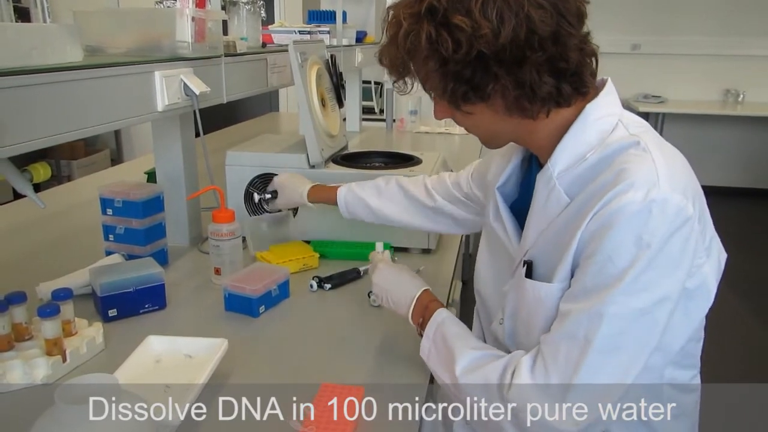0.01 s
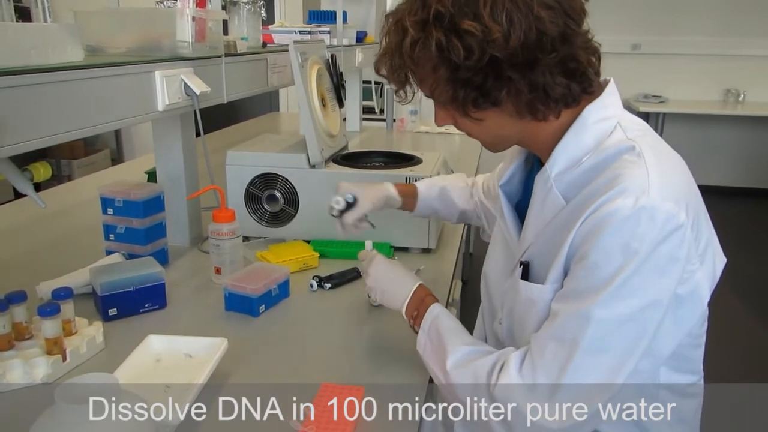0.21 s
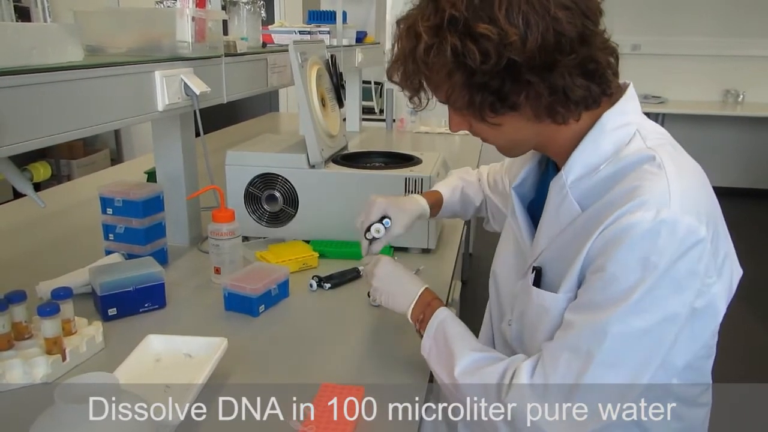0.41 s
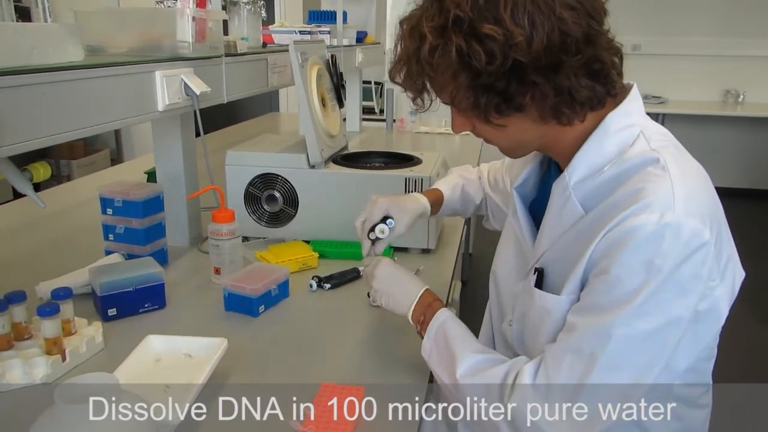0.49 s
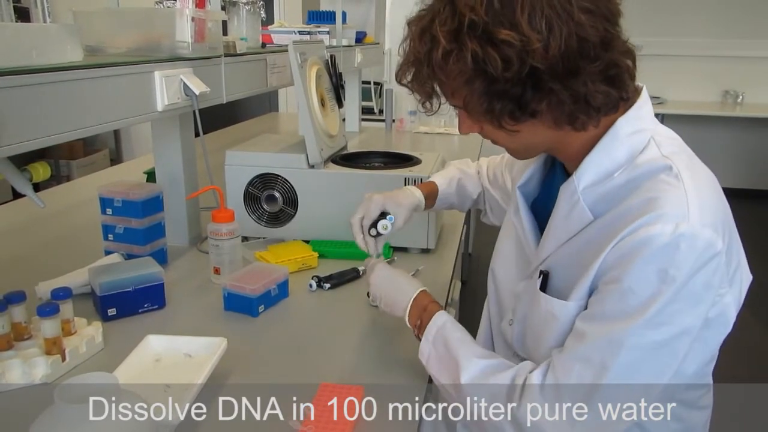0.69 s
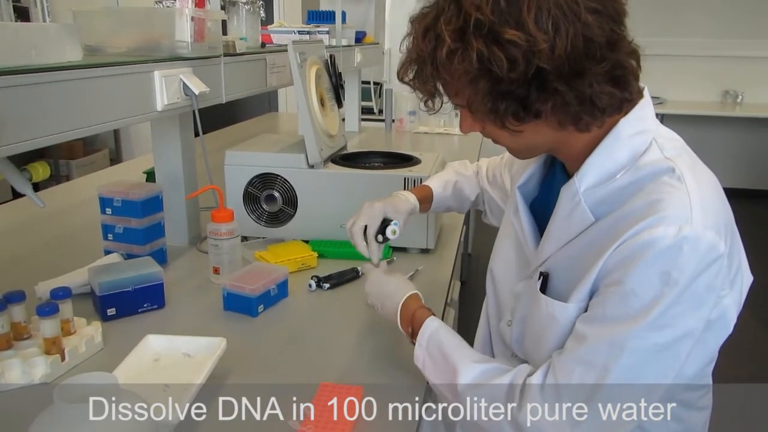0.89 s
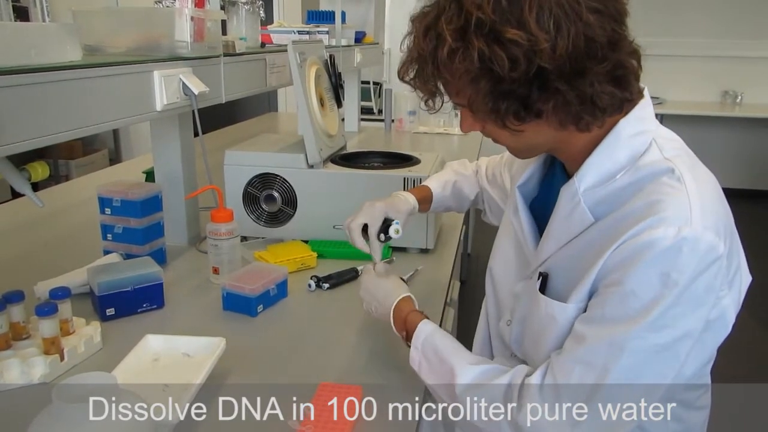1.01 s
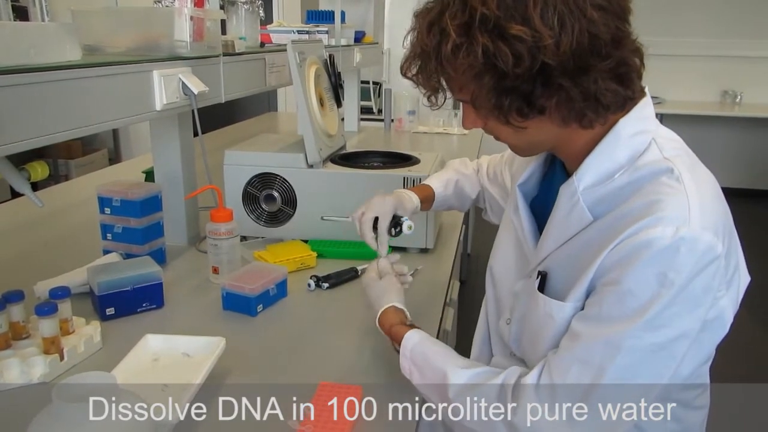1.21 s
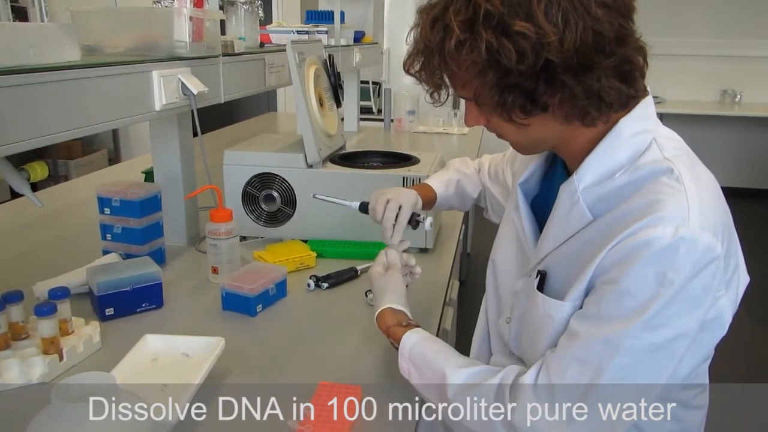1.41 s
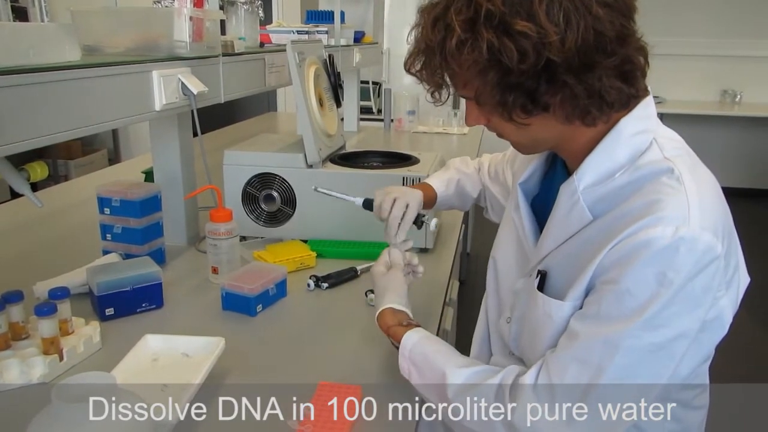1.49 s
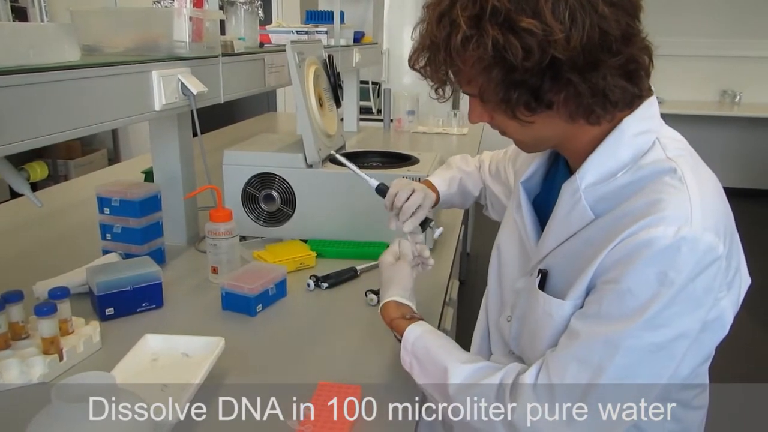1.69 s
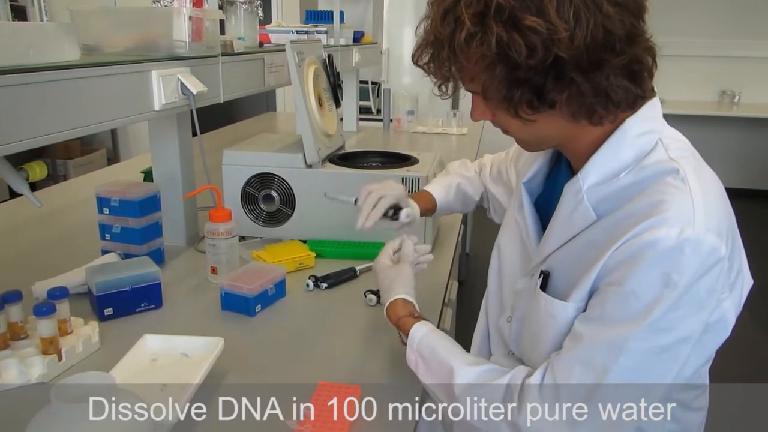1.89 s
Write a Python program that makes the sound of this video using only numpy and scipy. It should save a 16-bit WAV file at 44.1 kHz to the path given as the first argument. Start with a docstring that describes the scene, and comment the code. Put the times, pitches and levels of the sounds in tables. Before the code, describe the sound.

Two crisp plastic clicks from a lab pipette echo briefly, followed by very light handling ticks

```python
"""Quiet laboratory bench: a plastic pipette and a sample tube are handled.
Hard plastic snaps twice, as cracks and damped modes; the room echoes and bench items ring faintly.
Then light ticks (band-limited bursts) and small clinks of the plunger spring (rattle plus modes).
Ventilation hums low as shaped noise; the recorder's gain control ducks everything after the loud snap."""
import sys
import numpy as np
from scipy import signal
from scipy.fft import rfft, irfft
from scipy.io import wavfile
from scipy.ndimage import minimum_filter1d

SR = 44100
rng = np.random.default_rng(int(sys.argv[2]) if len(sys.argv) > 2 else 0)


def put_to_file(sound):
    """Save the sound as 16-bit audio at rate SR, in the file named by the first command-line argument."""
    columns = np.atleast_2d(sound).T  # one column per channel
    safe = np.clip(columns, -1, 1)
    whole_steps = np.round(safe * 32767)
    wavfile.write(sys.argv[1], SR, whole_steps.astype(np.int16))


N = 88200  # samples, 2 s

# Ventilation and hiss, spectrum shape: freq_hz, density_db_per_hz (relative)
AIR_SPECTRUM = [(12, -24.5), (22, -3), (35, 0), (50, -1.5), (78, -9), (125, -5), (190, -6.5), (280, -26.5),
                (400, -30.5), (550, -33), (850, -32.5), (1200, -35.5), (1800, -39), (3000, -44),
                (6000, -50.5), (10500, -49.5), (12500, -57), (16000, -65.5)]
AIR_LEVEL_DB = -46.5
# Upper hum, level over time: time_s, level_db
HUM_LEVEL = [(0, -54.5), (0.201, -54), (.7, -57.5), (1.1, -55.5), (1.381, -52.5), (1.5, -63.5), (2, -67.5)]
HUM_HZ, HUM_SIGMA_HZ = 239.4, 70.2
# Faint fan resonance
FAN_HZ, FAN_HALF_WIDTH_HZ, FAN_LEVEL_DB = 960, 35, -76.5

# Room decay: freq_hz, t60_s
ROOM_DECAY = [(250, .6), (500, .5), (1000, 0.52), (2400, 0.69), (3400, .52), (4600, 0.57), (6000, 0.59),
              (8600, 0.44), (10500, .62), (16000, 0.53)]
ROOM_BUILD_S, SNAP_ROOM_DB, SMALL_ROOM_DB = 0.004, -16.5, -8
# Faint long ring of things on the bench: freq_hz, level_db, t60_s
BENCH_MODES = [(374.8, -47.5, 0.56), (649.8, -37, .55), (784, -47, .9), (909, -39.5, 0.74),
               (1297, -42.5, 0.67), (1857, -38, 0.72), (2020, -42, 0.57), (2420, -47, .6)]

# Light plastic ticks and scrapes: start_s, level_db, centre_hz, width_octaves, t60_s
TICKS = [(0.5188, -33, 6470, 0.74, 0.0096), (0.639, -56, 5070, 0.73, 0.037), (.639, -54, 2460, 0.066, 0.11),
         (0.6726, -58, 10700, 0.14, .06), (.675, -63, 5800, .1, 0.068), (.692, -57, 5760, 0.085, 0.047),
         (0.7123, -56.5, 3450, 0.92, 0.021), (.72, -62.5, 1790, 0.046, 0.24),
         (.735, -63.5, 783, 0.071, 0.29), (.9437, -61, 4900, 0.22, .03), (1.0932, -62, 4170, 0.22, 0.088),
         (1.2021, -62, 10500, 0.094, 0.11), (1.4256, -65, 7950, 0.93, 0.017),
         (1.525, -66, 4200, .5, 0.0079), (1.5707, -66, 6950, 0.37, .012),
         (1.5765, -62.5, 5940, 0.36, 0.017), (1.5987, -61.5, 9200, 0.17, 0.0398),
         (1.7354, -59, 5940, 1, 0.011), (1.757, -59, 5500, 0.99, 0.014), (1.7642, -57, 4500, 1, 0.016),
         (1.768, -55, 2760, 0.11, 0.074), (1.786, -62, 2960, 0.24, 0.024), (1.7957, -55, 3000, .5, .008)]
TICK_TOP_HZ = 11400

# Plunger spring modes, pressed: freq_hz, level_db, t60_s
SPRING_PRESSED_MODES = [(1875, -2, 0.17), (5000, -4, 0.17), (7800, -19, .15), (8620, -5.5, 0.2),
                        (9260, -12, 0.083), (9970, -5.5, 0.18)]
# Plunger spring modes, half released: freq_hz, level_db, t60_s
SPRING_HALF_MODES = [(2411, -1.5, 0.07), (4580, -3.5, 0.097), (5410, -4, 0.08), (6050, -4.5, 0.058),
                     (7890, -8, 0.076), (8160, -21, 0.071), (9450, -12, 0.088), (14580, -6, .06)]
# Plunger spring modes, at its stop: freq_hz, level_db, t60_s
SPRING_STOP_MODES = [(3010, -2.5, 0.14), (5760, 0.5, 0.25), (6240, -2, 0.071), (7600, -7, .22),
                     (7760, -4.5, .09), (8204, -4.5, 0.13), (9600, -6, .11), (10260, -5.5, 0.093),
                     (11030, -11, .1), (13100, -15, 0.16), (13980, 1, .07), (14570, -4, .09)]
# Clinks: start_s, level_db, spring_position (0 pressed, 1 half, 2 stop), tilt_db_per_octave
CLINKS = [(0.8677, -59.5, 0, 1), (1.6185, -56, 1, -2.5), (1.6232, -57.5, 1, -4), (1.8268, -55.5, 2, 3),
          (1.8328, -55.5, 2, -5), (1.8443, -58, 2, -5), (1.983, -58, 1, 2)]
CLINK_RISE_S, RATTLE_DB, RATTLE_T60_S, RATTLE_HALF_WIDTH_HZ = 0.0019, 2, 0.087, 170
SPRING_DETUNE = 0.002  # standard deviation, fraction of mode frequency

# Contacts within the two snaps: start_s, level_db, tilt_db_per_octave
SNAP_CONTACTS = [(0.1992, -42.5, 0), (0.2003, -29, -6.5), (.2022, -4, 0), (0.2035, -8.5, -0.5),
                 (0.2045, -15, 0), (0.2906, -13.5, 0.5), (0.2926, -14.5, -2.5)]
# Snapping plastic modes: freq_hz, level_db, t60_s
PLASTIC_MODES = [(1090, -7.5, 0.036), (1400, -13.5, 0.028), (1823, -7, .025), (2503, -8.5, .035),
                 (2800, -16.5, 0.064), (4550, -3, .008), (5990, -2, .009), (8120, -7.5, 0.008),
                 (10120, -8, .008), (10850, -7, .009), (12800, -10.5, .007)]
# Snap spectrum radiated into the room, all directions: freq_hz, level_db (relative)
RADIATED_SPECTRUM = [(100, -21.5), (250, -1), (480, -2.5), (800, 3), (1300, 3), (1900, -0.5), (2600, -2.5),
                     (3000, -10.5), (4600, -8), (5200, -13.5), (6000, -7.5), (7000, -15), (8200, -9),
                     (9300, -11.5), (10700, -10.5), (12300, -20.5), (15500, -22.5)]
RADIATED_DB = -17.5
CRACK_DB, CRACK_T60_S, CRACK_LOW_HZ, CRACK_TOP_HZ = -7.5, 0.012, 705, 9000
BODY_LOW_HZ = 600
TILT_PIVOT_HZ = 4000

# Gain control and band limit; DUCK_SHARE is dB of cut per dB over threshold
THRESHOLD_DB, DUCK_SHARE, RECOVER_DB_PER_S = -23, 0.45, 33.5
ATTACK_S, HOLD_S, POWER_WINDOW_SAMPLES = 0.004, 0.34, 128
CUTOFF_HZ = 15800


def amp(db):
    """Decibels to amplitude gain."""
    return 10 ** (np.asarray(db) / 20)


def unit(x):
    """Scale to rms 1."""
    return x / np.sqrt(np.mean(x ** 2) + 1e-20)


def read_spectrum(table, hz):
    """Interpolate the second column of a table along log frequency."""
    table_hz, values = np.transpose(table)
    return np.interp(np.log(hz + 1), np.log(table_hz + 1), values)


def add(mix, start_s, sound):
    """Mix in a sound at its start time, cut at the end of the mix."""
    part = mix[round(start_s * SR):][:len(sound)]
    part += sound[:len(part)]


def noise(gain):
    """Gaussian noise shaped by gain(frequency in Hz), rms 1."""
    f = np.fft.rfftfreq(N, 1 / SR) + 1  # +1 avoids zero frequency
    return unit(irfft(rfft(rng.standard_normal(N)) * gain(f), N))


def ring(modes, tilt_db, t, detune):
    """Decaying sines of a struck part, tilted by contact hardness, alternating in sign."""
    total = np.zeros(len(t))
    for k, (hz, db, t60_s) in enumerate(modes):
        level_db = db + tilt_db * np.log2(hz / TILT_PIVOT_HZ)
        mode_hz = hz * (1 + detune * rng.standard_normal())
        total += (-1) ** k * amp(level_db - 60 * t / t60_s) * np.sin(2 * np.pi * mode_hz * t)
    return total


def ventilation():
    """Low rumble and thin hiss, a hum that swells and sinks, a faint fan resonance."""
    t = np.arange(N) / SR
    air = amp(AIR_LEVEL_DB) * noise(lambda f: amp(read_spectrum(AIR_SPECTRUM, f)))
    hum = noise(lambda f: np.exp(-0.5 * ((f - HUM_HZ) / HUM_SIGMA_HZ) ** 2))
    hum_gain = amp(np.interp(t, *np.transpose(HUM_LEVEL)))
    fan = noise(lambda f: 1 / (1 + ((f - FAN_HZ) / FAN_HALF_WIDTH_HZ) ** 2))
    return air + hum * hum_gain + amp(FAN_LEVEL_DB) * fan


def room_tail(wash):
    """A wash of reflections builds up, then each band dies at its own rate."""
    hz, t, bands = signal.stft(wash, SR, nperseg=256)
    decay = amp(-60 * t / read_spectrum(ROOM_DECAY, hz)[:, None])
    tail = signal.istft(bands * decay, SR, nperseg=256)[1][:N]
    return tail * np.minimum(np.arange(N) / SR / ROOM_BUILD_S, 1)


def room(x):
    """Dense reflections off benches and walls: convolution with a unit-energy noise tail."""
    tail = room_tail(rng.standard_normal(N))
    return signal.fftconvolve(x, tail / np.linalg.norm(tail))[:N]


def bench():
    """The loudest contact sets nearby things ringing faintly."""
    out, t = np.zeros(N), np.arange(N) / SR
    loudest_s = max(SNAP_CONTACTS, key=lambda row: row[1])[0]
    add(out, loudest_s, ring(BENCH_MODES, 0, t, 0) * np.minimum(t / ROOM_BUILD_S, 1))
    return out


def ticks():
    """Tip, tube and cap touch: decaying noise bursts, each in its own band."""
    out, t = np.zeros(N), np.arange(N) / SR
    for start_s, db, hz, octaves, t60_s in TICKS:
        def band(f):
            peak = 1 / np.hypot(1, (np.log2(f / hz) / octaves) ** 2)
            return peak / np.hypot(1, (f / TICK_TOP_HZ) ** 2)
        add(out, start_s, noise(band) * amp(db - 60 * t / t60_s))
    return out


def clinks():
    """The plunger jolts its spring, which rattles briefly around its modes and rings on."""
    out, t = np.zeros(N), np.arange(N) / SR
    springs = (SPRING_PRESSED_MODES, SPRING_HALF_MODES, SPRING_STOP_MODES)
    for start_s, db, position, tilt_db in CLINKS:
        modes = springs[int(position)]

        def near_modes(f):
            return sum(amp(level_db) / (1 + ((f - hz) / RATTLE_HALF_WIDTH_HZ) ** 2)
                       for hz, level_db, _ in modes)
        rattle = noise(near_modes) * amp(RATTLE_DB - 60 * t / RATTLE_T60_S)
        sound = ring(modes, tilt_db, t, SPRING_DETUNE) + rattle
        add(out, start_s, amp(db) * np.minimum(t / CLINK_RISE_S, 1) * sound)
    return out


def snaps():
    """Each contact cracks and rings damped plastic; returns direct sound and diffuse echo."""
    direct, echo, t = np.zeros(N), np.zeros(N), np.arange(N) / SR
    for start_s, db, tilt_db in SNAP_CONTACTS:
        def noise_tilt_db(f):
            return tilt_db * np.log2((f + 500) / TILT_PIVOT_HZ)

        def crack_gain(f):
            band = 1 / np.hypot(1, (CRACK_LOW_HZ / f) ** 2) / np.hypot(1, f / CRACK_TOP_HZ)
            return amp(noise_tilt_db(f)) * band

        def radiated_gain(f):  # half the tilt
            return amp(read_spectrum(RADIATED_SPECTRUM, f) + noise_tilt_db(f) / 2)
        crack = noise(crack_gain) * amp(CRACK_DB - 60 * t / CRACK_T60_S)
        add(direct, start_s, amp(db) * (ring(PLASTIC_MODES, tilt_db, t, 0) + crack))
        add(echo, start_s, amp(db + RADIATED_DB) * room_tail(noise(radiated_gain)))
    high_pass = signal.butter(2, BODY_LOW_HZ, "high", fs=SR)
    return signal.lfilter(*high_pass, direct), echo


def scene():
    """Sum of room air, handling sounds and their echoes, one channel."""
    air = ventilation()
    small = ticks() + clinks()
    snap, snap_echo = snaps()
    reflections = room(amp(SNAP_ROOM_DB) * snap + amp(SMALL_ROOM_DB) * small)
    return (air + reflections + bench() + small + snap + snap_echo)[None]


def record(dry):
    """Gain control dips quickly, holds and recovers linearly in dB; then a low-pass."""
    window = np.ones(POWER_WINDOW_SAMPLES) / POWER_WINDOW_SAMPLES
    power = signal.lfilter(window, 1, dry[0] ** 2)
    wanted_db = DUCK_SHARE * np.maximum(10 * np.log10(power + 1e-12) - THRESHOLD_DB, 0)
    # running maximum over the past HOLD_S
    half = int(HOLD_S * SR / 2)
    held_db = -minimum_filter1d(-wanted_db, 2 * half + 1, origin=half, mode="constant")
    # limit the recovery slope
    fall_db = np.arange(N) * RECOVER_DB_PER_S / SR
    recovering_db = np.maximum.accumulate(held_db + fall_db) - fall_db
    # one-pole smoothing
    pole = np.exp(-1 / (ATTACK_S * SR))
    duck_db = signal.lfilter([1 - pole], [1, -pole], recovering_db)
    low_pass = signal.firwin(255, CUTOFF_HZ, window=("kaiser", 9), fs=SR)
    return signal.oaconvolve(dry * amp(-duck_db), low_pass[None], "same")


dry = scene()
out = record(dry)
put_to_file(out)
```